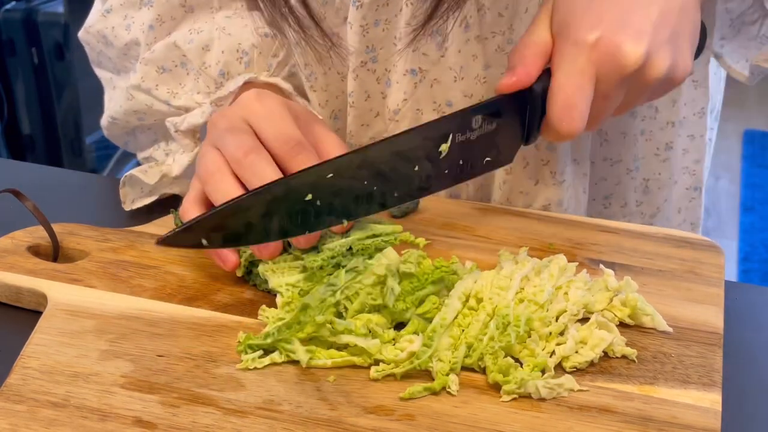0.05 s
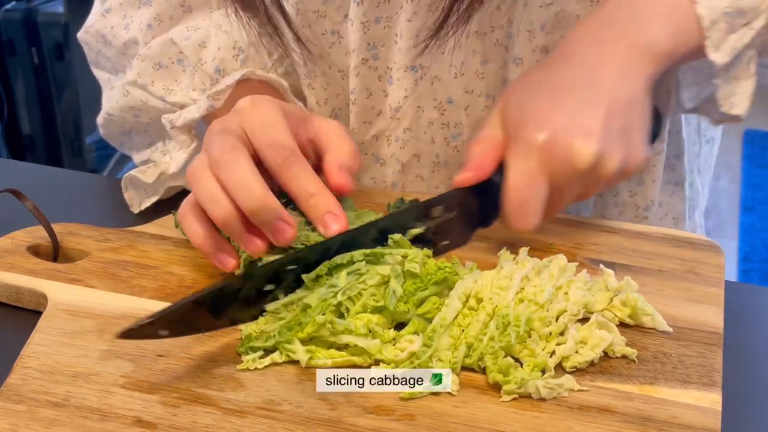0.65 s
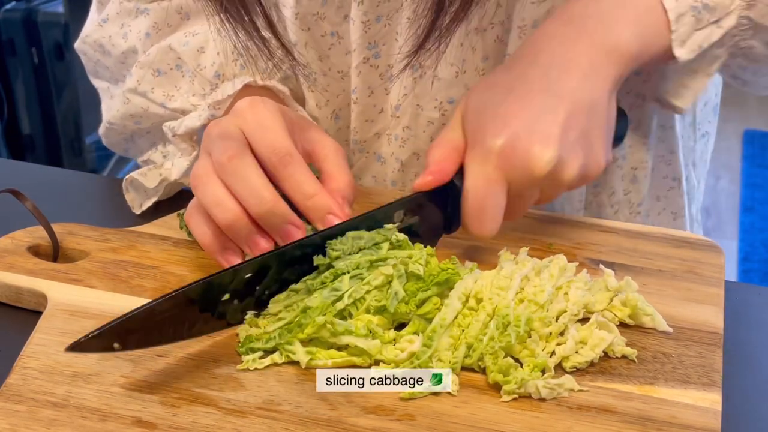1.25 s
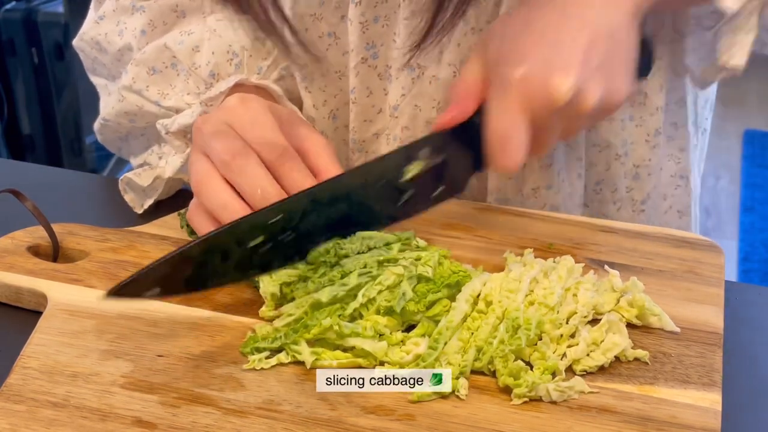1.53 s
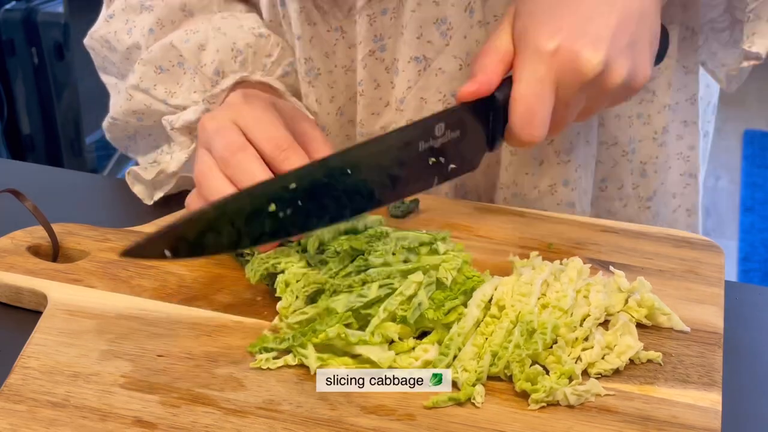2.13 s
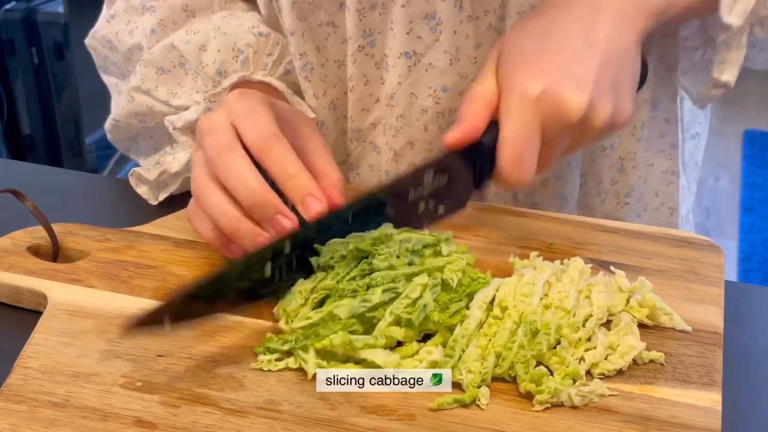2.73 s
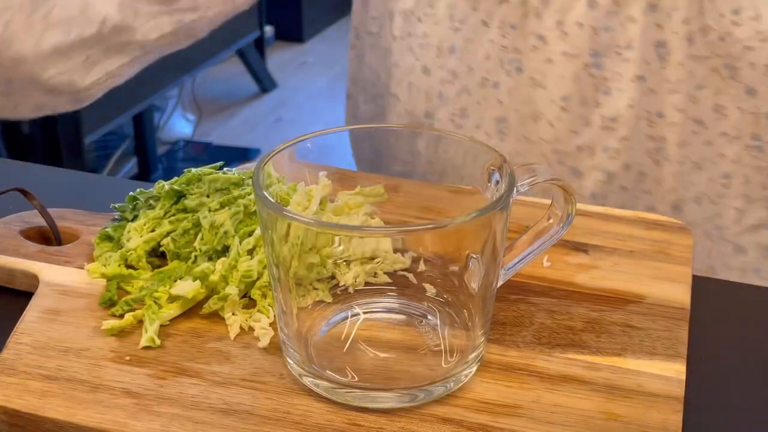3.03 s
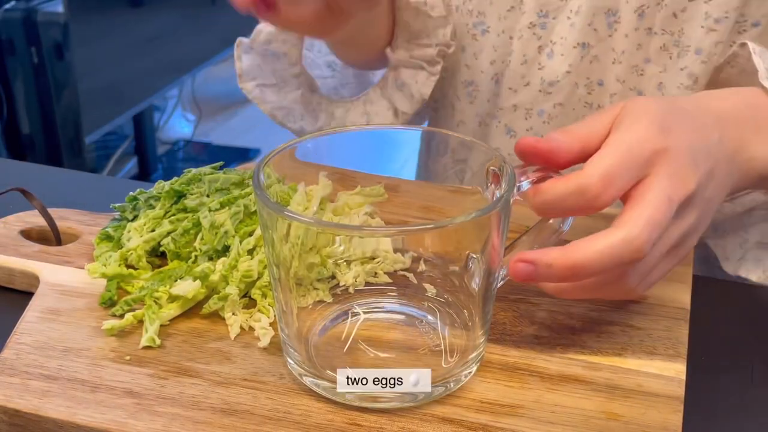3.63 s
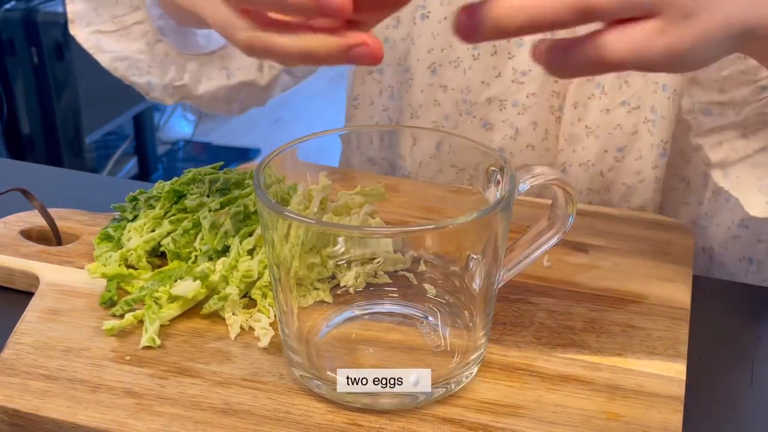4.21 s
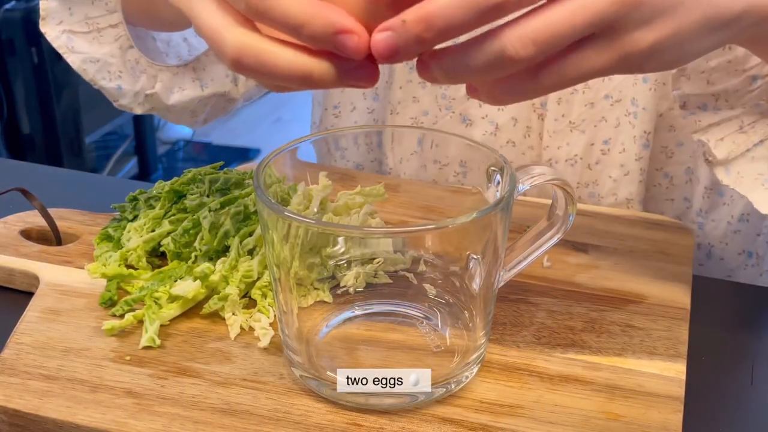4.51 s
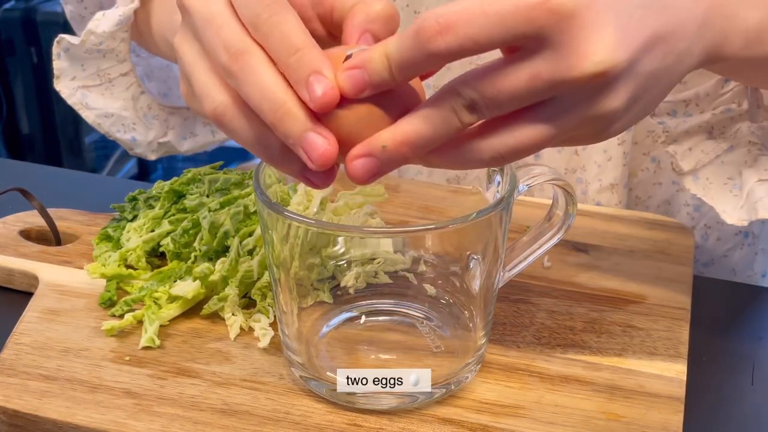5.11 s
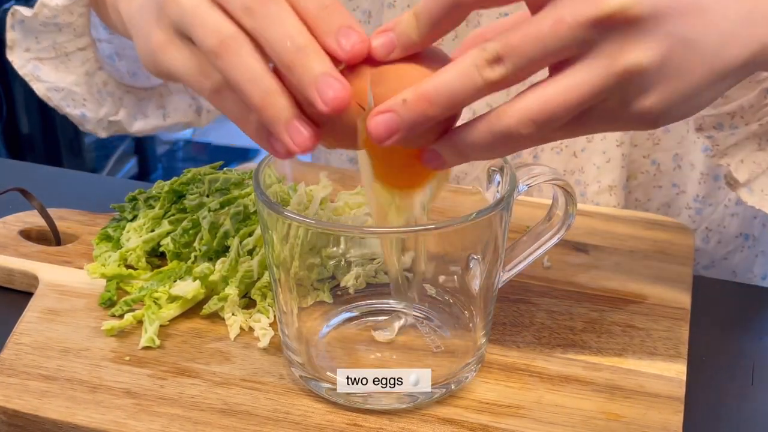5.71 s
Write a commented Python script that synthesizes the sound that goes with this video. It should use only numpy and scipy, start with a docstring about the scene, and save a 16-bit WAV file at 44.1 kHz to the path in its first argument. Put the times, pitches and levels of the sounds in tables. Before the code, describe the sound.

A chef's knife shreds cabbage, heard from close by in a small kitchen. Each slice is two short, crunchy pushes through the leaves, with snapping ribs and a faint trailing hiss. The edge lands with sharp wooden knocks at about 0.5, 1.2, 1.8 and 2.5 seconds, the loudest sounds, while the table booms softly underneath. A faint low thump follows near 2.9 seconds. At 3.5 and 3.7 seconds an egg is tapped on a glass cup, each tap a dull knock with a light glassy ring and a table thud; the second crushes the shell. From 4.6 seconds the shell is prised open with quiet, brittle, hollow cracks and faint wet squelching, the biggest crack near 5.5 seconds. A tiny wet air pocket pops at 5.8 seconds. A low mains hum and soft rumble continue throughout, with a short room reverberation.

```python
"""A chef's knife shreds cabbage on a wooden board: cells burst in a crunch, ribs snap, the edge knocks
on the wood and the table booms underneath. Then an egg is tapped twice on a glass cup, ringing it, and
the shell is prised open: cracks ring its hollow, the membrane squelches and an air pocket pops.
All is heard from close by in a small kitchen, over a low mains hum and a soft rumble."""
import sys
import numpy as np
from scipy import signal
from scipy.fft import rfft, irfft
from scipy.io import wavfile

SR = 44100
rng = np.random.default_rng(int(sys.argv[2]) if len(sys.argv) > 2 else 0)


def unload_wav(signal):
    """Save mono or channel-first audio to the path in sys.argv[1] as 16-bit WAV at rate SR, clipped to [-1, 1]."""
    wavfile.write(
        sys.argv[1],
        SR,
        np.round(np.clip(np.atleast_2d(signal).T, -1, 1) * 32767).astype(np.int16),
    )


N = 262395
TIME = np.arange(N) / SR
RING_TIME = TIME[:SR]  # one second for a sound to ring out


# knife strokes, two to a slice, each a push through the leaves, then a faint, even treble hiss:
# (t/s, push length/s, crunch level/dB, weight on the table/dB, hiss length/s, hiss level/dB)
STROKES = [(0.221, .074, -36, -9, .12, -50.5), (.464, .042, -26.5, -10, 0.21, -56.5),
           (0.89, .065, -35, -7, .13, -56.5), (1.112, .063, -27.5, -4.5, 0.19, -58),
           (1.506, .088, -32.5, -5.5, 0.14, -51), (1.743, .038, -27.5, 2, 0.22, -57.5),
           (2.221, .086, -34, -12.5, .11, -52.5), (2.45, .046, -26.5, -3, .19, -60)]
# thick ribs snapping: (t/s, level/dB)
RIB_SNAPS = [(0.29, -22.5), (.736, -51.5), (1.127, -25.5), (1.1765, -10.5), (1.378, -42), (1.505, -32),
             (1.865, -36.5), (2.34, -33), (2.479, -24.5), (2.671, -41.5)]
# brief, soft rustles: (t/s, length/s, level/dB)
RUSTLES = [(0.189, 0.036, -59), (0.348, 0.062, -46.5), (0.437, 0.021, -42.5), (0.782, 0.034, -65),
           (1.405, 0.0099, -63), (2.05, .012, -64.5), (2.107, 0.018, -71), (2.861, 0.043, -66),
           (3.47, 0.15, -73)]
# tone of crisp leaves: (f/Hz, level/dB)
LEAF_EQ = [(150, -9.5), (450, 3.5), (750, -9.5), (1700, -5.5), (2350, -5), (2850, 3.5), (4500, 1.5),
           (7500, 1.5), (10000, 3.5), (12000, 1.5), (15500, -5.5)]
# faint ring of the blade: (f/Hz, level/dB, t60/s)
BLADE_MODES = [(1610, -34.5, 0.024), (3130, -33.5, 0.0096)]

def cabbage():
    """Cells burst under the edge in clumps and ribs snap; a faint hiss lingers after each stroke."""
    # a push swells as the leaves pack and stops when the blade is through
    cutting = sum(gesture(s, push, db, swell_db=3, rise=.51 * push, t60=.033)
                  for s, push, db, _, _, _ in STROKES)
    tails = [(s + push, length, db) for s, push, _, _, length, db in STROKES]
    hiss_gain = sum(gesture(s, length, db, swell_db=-3.5, rise=.014, t60=.056)
                    for s, length, db in tails + RUSTLES)
    clumps = undb(3 * walk(per_s=130))
    bursts = crackle(per_s=1500, spread_db=5.2) + undb(-10) * fractures(per_s=740, spread_db=4.4)
    cells = cutting * clumps * bursts
    hiss = undb(.5) * hiss_gain * crackle(per_s=2400, spread_db=6.3)
    last_leaves = [(s - .001, -18.5) for s, _, _, _ in CHOPS]  # burst just before the edge lands
    snaps = noise_bursts(RIB_SNAPS + last_leaves, t60=.01)
    board_shake = undb(-39.5) * convolve(cells, ring(BOARD_MODES))
    table_shake = undb(-38) * convolve(cells + hiss, table_top())
    blade = convolve(hiss, ring(BLADE_MODES))
    return colour(cells + hiss + snaps, LEAF_EQ) + board_shake + table_shake + blade


# the edge landing on the board: (t/s, level/dB, contact/ms, table thud/dB)
CHOPS = [(0.5051, 3.5, 0.34, -1), (1.177, 4.5, 0.39, -7), (1.7846, -2, 0.36, -8), (2.495, 7, 0.4, 2)]
# woody body of the board: (f/Hz, level/dB, t60/s)
BOARD_MODES = [(233.5, -18.5, 0.1), (310, -25.5, 0.1), (466, -19.5, 0.073), (548, -10.5, .05),
               (610, -18.5, 0.045), (828, -15, 0.039), (960, -4.5, 0.0072), (1076, -11.5, .035),
               (1247, -9, 0.032), (1352, -1, .022), (1730, -4, .018), (1730, -11.5, 0.023),
               (1972, -19.5, 0.034), (2030, -11.5, 0.029), (2590, -11.5, .02), (2980, -5.5, 0.023),
               (4200, -24, 0.014)]
# quickly damped bending right under the edge: (f/Hz, level/dB, t60/s)
CONTACT_MODES = [(1040, -6.5, 0.0094), (1510, 4.5, 0.005)]

def board():
    """The edge knocks on the wood; a nearby surface throws the knock back, later on the right."""
    attack = 1 - fade(.005)  # the wood takes a moment to give
    treble = butter(rng.standard_normal(SR), [2400, 10000], "band")
    grit = undb(-4.5) * fade(.075) * treble  # dense high modes of blade and board
    wood = attack * (undb(-4.5) * ring(BOARD_MODES) + undb(7) * ring(CONTACT_MODES) + grit)
    force = blows([(s, db, ms) for s, db, ms, _ in CHOPS])
    knock = undb(-3.5) * convolve(force, wood)
    echoes = [(.0025, -7.5), (.0031, -14)]  # left, right: (delay/s, level/dB)
    return np.array([knock + undb(db) * np.interp(TIME - lag, TIME, knock) for lag, db in echoes])


# low boom of the table top: (f/Hz, level/dB, t60/s)
TABLE_MODES = [(67, -22.5, 0.34), (87.74, -2, 0.35), (137.8, 3, 0.16), (161, -4, 0.24), (187.4, -1.5, 0.19),
               (216.4, -2.5, .12)]

def table_top():
    """Impulse response of the table; its neighbouring modes move in opposite directions."""
    return ring(TABLE_MODES, flip=-1)


# a brief, faint low boom between the chopping and the egg: (t/s, level/dB, pulse length/ms)
FAINT_BOOM = (2.862, -20, 6.8)

def table_thuds():
    """The table booms under each push, chop and egg tap; a faint low boom comes before the egg."""
    load_ms, stop_ms, chop_ms, tap_ms, lag_s = 4.1, 6.2, 4, 7.24, .00054
    pushes = [FAINT_BOOM]
    for s, push, _, db, _, _ in STROKES:
        # the hand's weight lands part-way through the push, and again when the blade stops
        pushes += [(s + .6 * push, db, load_ms), (s + push, db - 1, stop_ms)]
    pushes += [(s + lag_s, db, chop_ms) for s, _, _, db in CHOPS]
    pushes += [(s + lag_s, db, tap_ms) for s, _, _, _, db in EGG_TAPS]
    boom = convolve(blows(pushes), table_top())
    return undb(-19.5) * butter(boom, 60, "high")  # the slowest flexing moves little air


# egg against the cup: (t/s, base knock/dB, glass ring/dB, shell crush/dB, table thud/dB)
EGG_TAPS = [(3.462, -19, -35, -49, 1), (3.7431, -22.5, -34.5, -17, 2.5)]
# dull knock through the cup's base: (f/Hz, level/dB, t60/s)
CUP_BASE_MODES = [(391, -5.5, 0.065), (483, -12, 0.087), (990, -6.5, 0.043), (1082, 3.5, 0.015),
                  (1220, -21.5, 0.016)]
# bright ring of the glass: (f/Hz, level/dB, t60/s)
GLASS_MODES = [(1712, -10, .2), (1903, -18, .5), (4032, -6, .16), (4118, -3, .12), (5819, -9, .09),
               (6885, -16, .12), (8390, -19, .08), (11960, -11, .1), (12700, -17, .08)]
# tone of shell caving in: (f/Hz, level/dB)
CRUSH_EQ = [(200, -2), (600, 7.5), (1500, 9.5), (2800, 3.5), (3700, 1.5), (4900, -1.5), (7000, 4),
            (10000, 0), (15500, 4.5)]

def egg_taps():
    """Both taps ring the glass; the second caves the shell in."""
    cup, crush = np.zeros(N), np.zeros(N)
    attack = 1 - fade(.007)  # the shell is softer than the glass
    collapse = np.exp(-(RING_TIME / .00453) ** 4)
    splinters = undb(-13) * fade(.11)
    for s, knock_db, ring_db, crush_db, _ in EGG_TAPS:
        add(cup, s, attack * (undb(knock_db) * ring(CUP_BASE_MODES) + undb(ring_db) * ring(GLASS_MODES)))
        add(crush, s, undb(crush_db) * (collapse + splinters))
    return cup + colour(crush * fractures(per_s=10000, spread_db=.55), CRUSH_EQ)


# the shell giving way: (t/s, level/dB)
SHELL_CRACKS = [(4.637, -51), (4.658, -46.5), (4.7937, -54), (4.8995, -55), (4.928, -42), (4.976, -46),
                (5.0448, -36.5), (5.0654, -40.5), (5.3037, -45.5), (5.3135, -43.5), (5.341, -51),
                (5.367, -51.5), (5.425, -51), (5.4385, -34), (5.4585, -23.5), (5.5785, -47.5),
                (5.5923, -48), (5.646, -49.5), (5.7529, -36), (5.7915, -38)]
# tone of brittle shell: (f/Hz, level/dB)
SHELL_EQ = [(200, -38), (700, -27), (1100, -7.5), (1500, -31), (2300, -7.5), (4500, -1.5), (7000, -4),
            (10000, -1.5), (12500, 3), (15500, -11)]
SPLIT_S = 4.98  # the halves start to part

def egg_opening():
    """Cracks ring the hollow of the shell; the wet membrane ticks and squelches as it stretches."""
    cracks = noise_bursts(SHELL_CRACKS, t60=.024)
    jolts = np.zeros(N)
    for s, db in SHELL_CRACKS:
        boost_db = 3 + .77 * (db + 37)  # big cracks ring the hollow far more
        closed_db = -28 if s < SPLIT_S else 0  # a closed shell barely rings
        jolts[int(s * SR)] = undb(db + boost_db + closed_db)
    biggest_crack_s = max(SHELL_CRACKS, key=lambda row: row[1])[0]
    stretch = gesture(SPLIT_S, length=.76, db=-74.5, swell_db=-.5, rise=.017, t60=.017)
    gape = gesture(biggest_crack_s, length=.201, db=-74, swell_db=0, rise=.017, t60=.017)
    squelch = (undb(-8) * stretch + gape) * fractures(per_s=170, spread_db=7)
    ticks = stretch * crackle(per_s=180, spread_db=9.3)
    return colour(cracks + ticks, SHELL_EQ) + shell_hollow(jolts + squelch)


# air in the hollow of the shell: (multiple of its resonance, level/dB, t60/s)
HOLLOW_MODES = [(.42, -21, .012), (.64, -14, .012), (.88, -6, .012), (1.01, -1, .014), (1.14, -8, .011),
                (1.42, -14, .008), (1.95, -11, .01)]

def shell_hollow(x):
    """Ring the hollow of the shell, whose resonances waver and sink as the halves part."""
    closed_hz, sink_hz_per_s = 2570, 495
    hz = closed_hz - sink_hz_per_s * np.maximum(TIME - SPLIT_S, 0)
    phase = 2 * np.pi * np.cumsum(hz * (1 + .03 * walk(per_s=120))) / SR
    attack = 1 - fade(.006)
    hollow = np.zeros(N)
    for multiple, db, t60 in HOLLOW_MODES:
        carrier = np.exp(1j * multiple * phase)  # lets the ringing follow the moving pitch
        hollow += undb(db) * np.real(carrier * convolve(x / carrier, attack * fade(t60)))
    return butter(hollow, 1200, "high")  # too small to radiate bass


# one wet pop: (t/s, level/dB, starting f/Hz, t60/s)
AIR_POCKET = (5.794, -24, 2700, .017)

def bubble():
    """A pocket of air pops in the egg white; its pitch climbs as it opens."""
    s, db, start_hz, t60 = AIR_POCKET
    hz = start_hz * (1 + .13 * (1 - fade(.1)))
    envelope = undb(db) * fade(t60) * (1 - fade(.004))
    pop = np.zeros(N)
    add(pop, s, envelope * np.sin(2 * np.pi * np.cumsum(hz) / SR))
    return pop


def early_reflections(x):
    """Hands and cup scatter the sound, differently left and right; long waves pass them by."""
    treble = butter(x, 1500, "high")
    arrivals = (rng.random((2, SR)) < 1200 / SR) * (RING_TIME > .001)
    echoes = arrivals * rng.standard_normal((2, SR)) * fade(.045)
    return np.array([convolve(treble, side / np.linalg.norm(side)) for side in echoes])


# decay of the room: (f/Hz, t60/s)
ROOM_DECAY = [(100, 0.49), (600, 0.34), (2500, 0.37), (7000, 0.4), (15000, 0.23)]
# tone of the room: (f/Hz, level/dB)
ROOM_EQ = [(60, -6.5), (200, -4.5), (500, 6), (1500, 0), (4000, -2), (9000, -3.5), (15000, -17)]

def kitchen_reverb(x):
    """Diffuse reflections from walls and cupboards, dying soonest in the top treble."""
    hz, _, spectra = signal.stft(rng.standard_normal(SR), SR)
    age = np.linspace(0, 1, spectra.shape[1])
    decay = np.exp(-np.log(1000) * age / curve(ROOM_DECAY, hz)[:, None])
    build_up = (1 - fade(.017)) ** 2
    tail = build_up * signal.istft(spectra * decay)[1][:SR]
    return colour(convolve(x, tail / np.linalg.norm(tail)), ROOM_EQ)


# partials of the mains hum: (f/Hz, level/dB)
HUM_PARTIALS = [(59.5, -48.5), (118.6, -64), (173, -66.5)]
# slow wavering of the hum, followed more gently by the rumble: (t/s, level/dB)
HUM_SWELL = [(0, -2.5), (2.9, -1), (3.3, 1.5), (4.0, 1.5), (4.9, -2.5), (5.15, 2), (5.5, -2.5),
             (5.7, -15.5), (5.95, -1.5)]
# tone of the rumbling air: (f/Hz, level/dB)
AIR_EQ = [(25, -12), (45, -15), (65, -3.5), (100, -3.5), (130, -5), (200, -9.5), (330, -18), (500, -25),
          (1100, -29.5), (2400, -41), (4500, -49.5), (9000, -53.5), (16000, -55)]

def room_tone():
    """A mains hum, wandering in level and phase, over a soft rumble."""
    swell_db = np.interp(TIME, *np.transpose(HUM_SWELL))
    hum = np.zeros(N)
    for hz, db in HUM_PARTIALS:
        peak = np.sqrt(2) * undb(db + swell_db + .5 * walk(per_s=.57))
        hum += peak * np.sin(2 * np.pi * hz * TIME + .35 * walk(per_s=6))
    mid, side = (unit(colour(rng.standard_normal(N), AIR_EQ)) for _ in range(2))
    rumble = mid + undb(-8) * np.array([side, -side])
    return hum + undb(-59.5 + .34 * swell_db) * rumble


# phase lead of the left microphone port over the right: (f/Hz, phase/rad)
LEFT_LEAD = [(150, 0), (400, .2), (700, .8), (1000, -.7), (1350, .9), (1700, .2), (6800, .2), (7500, -1.5),
             (9000, -.8), (9900, -2.3), (12000, -3.2), (16000, -6)]
# level of the left port over the right: (f/Hz, level/dB)
LEFT_BALANCE = [(60, -2), (130, 1.6), (280, 3.1), (500, 2.5), (1000, 1.5), (3000, 0)]

def microphone_ports(x):
    """Two microphone ports hear the same sound out of phase, the left with fuller low mids."""
    hz = np.arange(N // 2 + 1) * SR / N
    left = undb(curve(LEFT_BALANCE, hz) / 2) * np.exp(.5j * curve(LEFT_LEAD, hz))
    return irfft(rfft(x) * np.array([left, 1 / left]), N)


def gesture(s, length, db, swell_db, rise, t60):
    """Gain envelope from time s: it builds, holds with a steady swell or sag, then dies away."""
    age = TIME - s
    attack = np.clip(age / rise, 0, 1)
    hold = undb(db + swell_db * (np.clip(age / length, 0, 1) - .5))
    release = np.exp(-np.log(1000) * np.clip((age - length) / t60, 0, 10))
    return attack * hold * release


def fractures(per_s, spread_db):
    """Random tiny breaks, most small and a few large; rms 1."""
    breaks = rng.random(N) < per_s / SR
    size = undb(spread_db * np.clip(rng.standard_normal(N), -2, 2))
    return unit(breaks * rng.choice([-1, 1], N) * size)


def crackle(per_s, spread_db):
    """Breaks of many sizes in six frequency bands, per_s in each; rms 1."""
    edges_hz = [60, 1200, 2400, 4000, 6400, 10000, 17000]
    bands = zip(edges_hz, edges_hz[1:])
    return unit(sum(butter(fractures(per_s, spread_db), band, "band") for band in bands))


def noise_bursts(rows, t60):
    """Brittle snaps: a dying burst of noise for each (t/s, level/dB)."""
    track = np.zeros(N)
    for s, db in rows:
        add(track, s, undb(db) * fade(t60) * rng.standard_normal(SR))
    return track


def blows(rows):
    """A force pulse for each (t/s, level/dB, contact/ms); a longer contact gives a duller blow."""
    force = np.zeros(N)
    for s, db, ms in rows:
        push = np.sin(np.pi * np.minimum(RING_TIME * 1000 / ms, 1)) ** 2
        add(force, s, undb(db) * push / push.sum())
    return force


def ring(modes, flip=1):
    """Impulse response of a body; flip -1 inverts every other mode."""
    return sum(flip ** k * undb(db) * fade(t60) * np.cos(2 * np.pi * hz * RING_TIME)
               for k, (hz, db, t60) in enumerate(modes))


def walk(per_s):
    """A random value that glides to a new target per_s times a second."""
    return np.interp(TIME * per_s, np.arange(N), rng.standard_normal(N))


def colour(x, eq, size=4096):
    """Shape a sound with a minimum-phase EQ, so nothing rings ahead of an attack."""
    hz = np.arange(size // 2 + 1) * SR / size
    cepstrum = irfft(np.log(undb(curve(eq, hz))))
    cepstrum[1:size // 2] *= 2
    cepstrum[size // 2 + 1:] = 0
    return convolve(x, irfft(np.exp(rfft(cepstrum))))


def butter(x, hz, kind):
    """Gentle filter, 12 dB per octave."""
    return signal.sosfilt(signal.butter(2, hz, kind, fs=SR, output="sos"), x)


def convolve(x, response):
    """Pass a sound through a response, keeping its length."""
    return signal.fftconvolve(x, response)[:len(x)]


def curve(points, hz):
    """Read a table of (f/Hz, value) on a log-frequency axis."""
    f, value = np.transpose(points)
    return np.interp(np.log(np.maximum(hz, 1)), np.log(f), value)


def add(track, s, sound):
    """Mix a sound into a track from time s on."""
    i = int(s * SR)
    track[i:i + len(sound)] += sound[:N - i]


def fade(t60):
    """One second of decay, 60 dB down after t60 seconds."""
    return np.exp(-np.log(1000) * RING_TIME / t60)


def undb(db):
    """Decibels to gain."""
    return 10 ** (np.asarray(db) / 20)


def unit(x):
    """Scale to rms 1."""
    return x / np.sqrt(np.mean(x ** 2))


def scene():
    """Knife, egg and table up close, with the kitchen around them."""
    chopping = cabbage() + board()
    egg = egg_taps() + egg_opening() + bubble()
    boom = table_thuds()
    chopping_mono = chopping.mean(axis=0)
    early = undb(-17) * early_reflections(chopping_mono + egg)
    send = undb(-15) * chopping_mono + undb(-12) * egg + undb(-11.5) * boom
    mid, side = kitchen_reverb(send), undb(-11.5) * kitchen_reverb(send)
    reverb = mid + np.array([side, -side])
    return microphone_ports(chopping + egg + boom + early + reverb) + room_tone()


def record(dry):
    """Thin the deepest bass, round the highest peaks and cut the top."""
    low_cut = signal.butter(2, 40, "high", fs=SR, output="sos")
    high_cut = signal.ellip(8, .1, 60, 16300, fs=SR, output="sos")
    rounded = np.tanh(signal.sosfiltfilt(low_cut, dry))
    return signal.sosfiltfilt(high_cut, rounded)


dry = scene()
out = record(dry)
unload_wav(out)
```